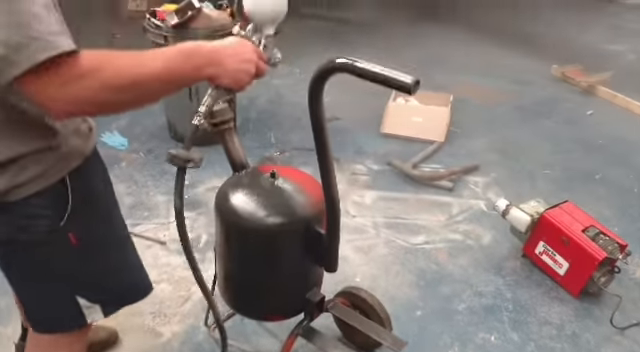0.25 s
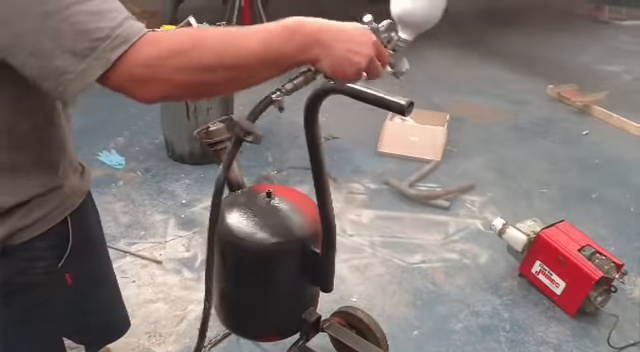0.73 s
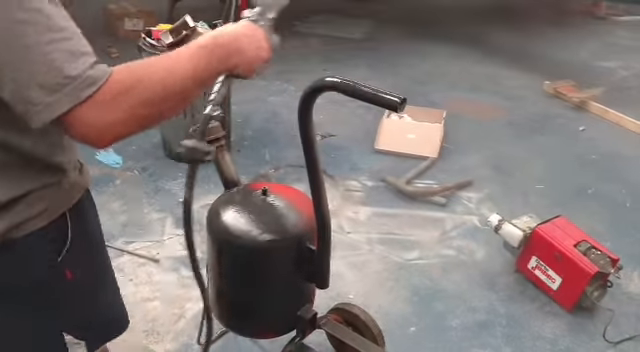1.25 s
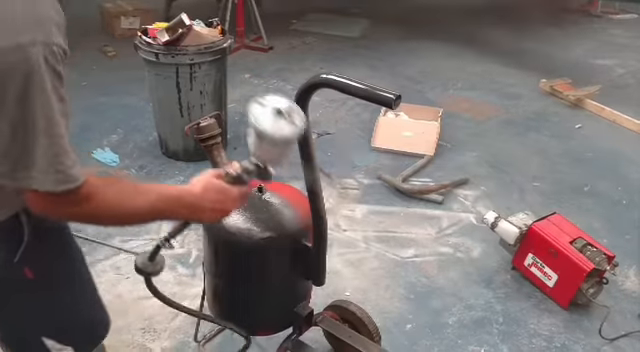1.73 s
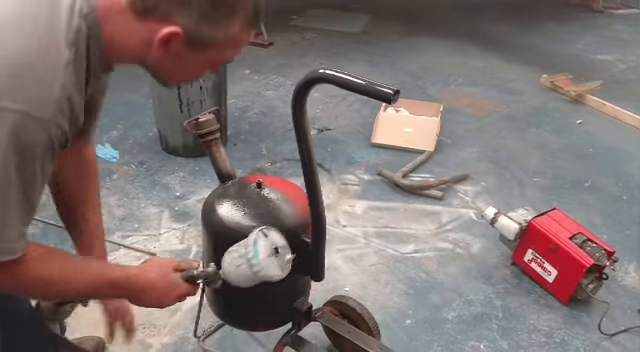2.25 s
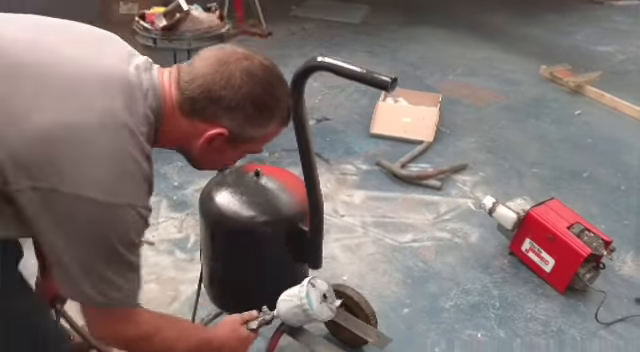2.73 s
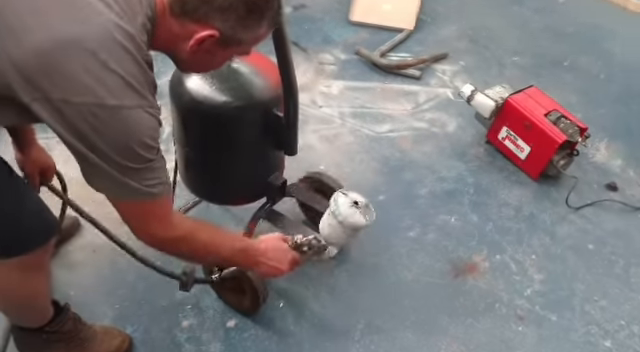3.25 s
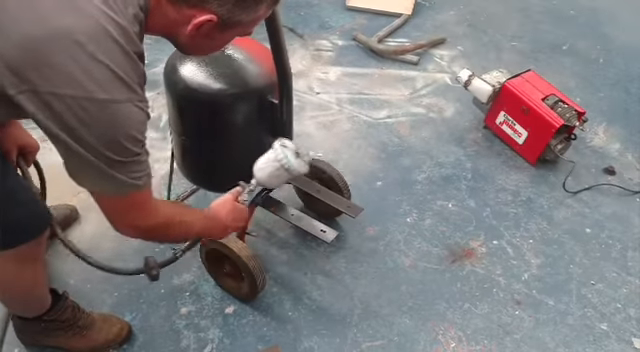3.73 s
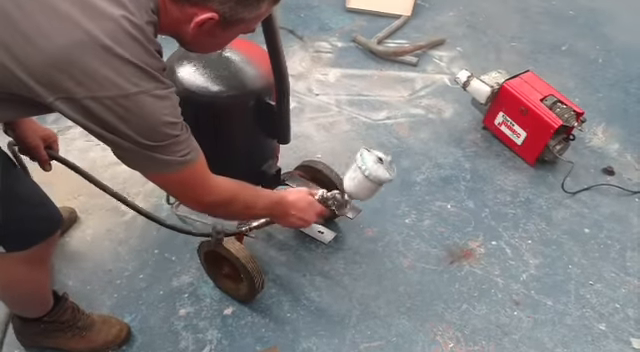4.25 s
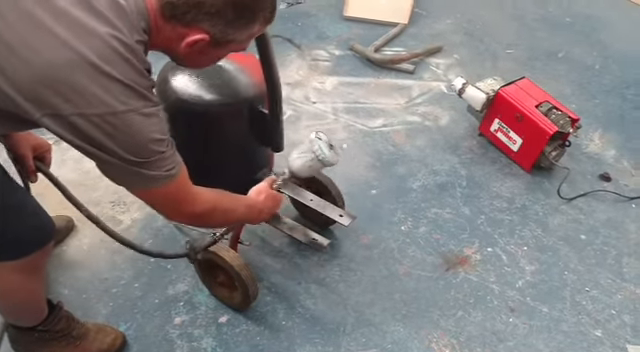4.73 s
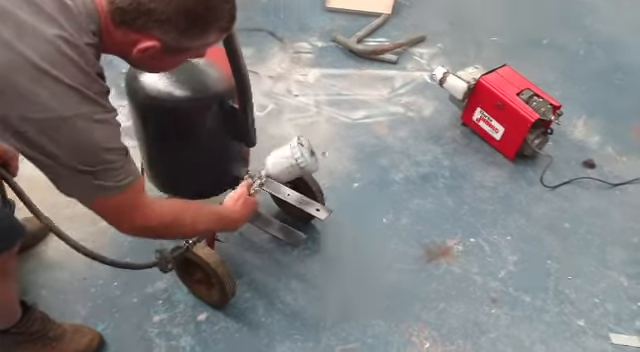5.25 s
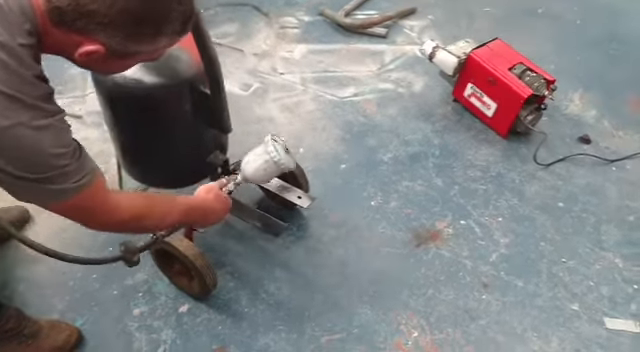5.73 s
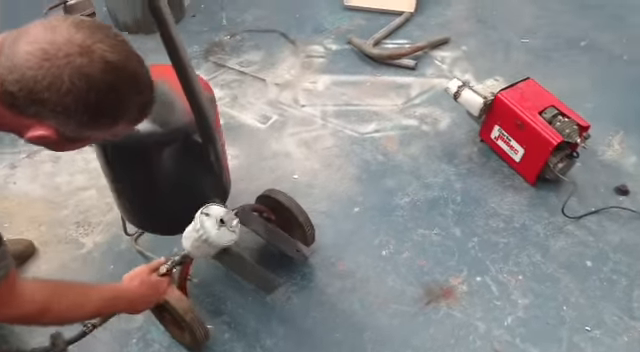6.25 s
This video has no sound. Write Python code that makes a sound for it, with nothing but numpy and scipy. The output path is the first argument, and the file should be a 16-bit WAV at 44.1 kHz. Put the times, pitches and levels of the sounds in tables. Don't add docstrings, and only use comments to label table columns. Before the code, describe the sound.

A compressed-air spray gun hisses in quick, uneven bursts in a large workshop while a motor hums and throbs faintly in the background.

```python
import sys
import numpy as np
from scipy import signal
from scipy.fft import rfft, irfft
from scipy.io import wavfile
from scipy.ndimage import uniform_filter1d

SR = 44100
rng = np.random.default_rng(int(sys.argv[2]) if len(sys.argv) > 2 else 0)


def magnitude_from_level(level_db):
    exponent = np.asarray(level_db, float) / 20
    return 10 ** exponent


def digitize_waveform(pressure):
    field = np.atleast_2d(pressure).T
    bounded = np.clip(field, -1, 1)
    quanta = np.round(bounded * 32767).astype(np.int16)
    wavfile.write(sys.argv[1], SR, quanta)


N = 286190

# valve opens [s], released [s], jet level [dB], opening puff [dB]
PULLS = [
    (-.05, 0.304, -29.5, 4),
    (0.413, 0.839, -31, -1.5),
    (0.963, 1.27, -32, -2),
    (1.762, 2.07, -31, -2),
    (2.908, 3.291, -29, 4),
    (3.412, 3.738, -32.5, 2),
    (3.869, 4.306, -31, -6),
    (4.413, 4.789, -30, -2.5),
    (4.981, 6.074, -32.5, 0),
    (6.308, 6.6, -33, 0),
]


def evened(x):
    return x / np.sqrt(np.mean(x ** 2) + 1e-20)


def read(points, hz):
    f, value = np.transpose(points)
    return np.interp(np.log(hz + 1), np.log(f + 1), value)


def hiss(shape_db, patchy_db, aimed=True):
    # frequency in Hz, likeness from -1 to 1
    alike = [(60, 0.28), (200, 1), (500, 0.99), (1200, 0.36), (2500, -0.036), (3700, 0.62), (5200, 0.16),
             (6500, -0.079), (9000, 0.15), (13000, -0.012), (15000, -0.15)]
    # frequency in Hz, phase in radians
    lead = [(100, 1), (350, 0.11), (800, 0.2), (1500, 0.016)]
    # time in seconds, added likeness
    facing = [(0, -.04), (1.3, -0.04), (3, 0.12), (4.9, 0), (5.15, -0.37), (5.45, -0.6), (5.55, -0.2),
              (5.8, -0.2), (5.9, -.6), (6.0, -0.6), (6.15, 0), (6.3, 0.1), (6.34, -0.7), (6.49, -0.4)]
    aim_hz, aim_width_hz = 5200, 1300
    wander = 0.18

    frames, hz = N // 128 + 5, np.fft.rfftfreq(512, 1 / SR)
    a, b, c, d, patches = rng.standard_normal((frames, 257, 5)).T
    patches = uniform_filter1d(patches, size=8, axis=0)
    patches = evened(uniform_filter1d(patches, size=24, axis=1))

    aim = aimed * np.interp(np.arange(frames) * 128 / SR, *np.transpose(facing))
    aim = aim * np.exp(-((hz[:, None] - aim_hz) / aim_width_hz) ** 2)
    drift = wander * np.roll(patches[::-1], 300, axis=1)
    same = np.clip(read(alike, hz)[:, None] + aim + drift, -0.98, 0.98)

    left = a + 1j * b
    shared = same * left * np.exp(1j * read(lead, hz))[:, None]
    right = shared + np.sqrt(1 - same ** 2) * (c + 1j * d)
    z = np.array([left, right]) * magnitude_from_level(shape_db(hz)[:, None] + patchy_db * patches)
    return evened(signal.istft(z, nperseg=512, noverlap=384)[1][:, :N])


def lift_db(t):
    lift_db_per_s, wait_s = 8, 0.033
    total = 0
    for (_, released, _, _), (next_start, _, _, _) in zip(PULLS, PULLS[1:]):
        total = total + lift_db_per_s * np.maximum(t - released - wait_s, 0) * (t < next_start)
    return total


def motor():
    # frequency in Hz, width in Hz, level in dB
    resonances = [(136, 16, 3), (439, 118, -1.5), (950, 410, -5.5), (1280, 130, -12), (1483, 343, 2),
                  (1994, 127, 1), (2580, 200, -3), (4020, 350, -14), (4920, 190, -14), (8100, 350, -12),
                  (12500, 400, -44)]
    # frequency in Hz, level in dB re motor
    whines = [(147, -13.5), (431, -12.5), (462, -21.5), (1413, -6), (1437, -20), (1480, -9), (1577, -11)]
    # frequency in Hz, level in dB
    fan = [(30, -40), (60, 6), (100, 26.5), (250, 16), (500, -9), (1500, 10), (3000, 14), (3600, -10),
           (8000, 6), (12500, -30), (16000, -36)]
    motor_db, fade_db_per_s = -47, -0.14
    fan_db, fan_patchy_db = -10.5, 2.2
    strokes_hz, throb = 70.4, 0.19

    t = np.arange(N) / SR
    hz = np.fft.rfftfreq(N, 1 / SR)
    z = rng.standard_normal((3, N))
    ports = z[:2] + 0.36 * z[2]
    power = sum(magnitude_from_level(2 * db) / (1 + (2 * (hz - f) / w) ** 4) for f, w, db in resonances)
    casing = evened(irfft(rfft(ports) * np.sqrt(power), N))

    drift = evened(uniform_filter1d(rng.standard_normal(N), size=3000))
    strokes = 1 + throb * np.cos(2 * np.pi * np.cumsum(strokes_hz * (1 + 0.039 * drift)) / SR)
    sound = casing * strokes
    sound = sound + magnitude_from_level(fan_db) * hiss(lambda hz: read(fan, hz), fan_patchy_db, aimed=False)

    for f, db in whines:
        waver = evened(uniform_filter1d(rng.standard_normal((N, 2)), size=4000, axis=0)).T
        phase = 2 * np.pi * np.cumsum(f + 2.93 * waver[1]) / SR
        sound = sound + magnitude_from_level(db - 2 + 0.87 * waver[0]) * np.sin(phase)
    return magnitude_from_level(motor_db + fade_db_per_s * (t - 3) + lift_db(t)) * sound


def room(x):
    t60_s, first_echo_s = 0.48, 0.006
    t = np.arange(SR // 2) / SR
    tail = rng.standard_normal((2, len(t))) * magnitude_from_level(-60 * t / t60_s) * (t > first_echo_s)
    return signal.fftconvolve(x, tail / np.linalg.norm(tail[0]), axes=1)[:, :N]


def trigger(t):
    leak_db = -54
    snap_db, valve_s, creep_db_per_s = -11, 0.007, -450
    puff_s = 0.0088
    shut_db, shut_s, drain_db_per_s = -2.5, 0.027, -140
    sweep_edge_s = 0.07

    power, off, dying = magnitude_from_level(2 * (leak_db + lift_db(t))), np.ones(N), np.zeros(N)
    for start, end, db, puff_db in PULLS:
        opening = snap_db * np.clip((start - t) / valve_s, 0, 1)
        opening = opening + creep_db_per_s * np.maximum(start - t, 0)
        surge = puff_db * np.exp(-abs(t - start) / puff_s)
        closing = shut_db * np.clip((t - end) / shut_s, 0, 1)
        closing = closing + drain_db_per_s * np.maximum(t - end, 0)
        power = power + magnitude_from_level(2 * (db + opening + surge + closing))
        off = off - np.clip(np.minimum(t - start, end - t) / sweep_edge_s, 0, 1)
        dying = dying + np.clip((t - end) / 0.045, 0, 1) * (t < end + 0.12)
    return 10 * np.log10(power), off, dying


def gun():
    # frequency in Hz, level in dB
    jet_shape = [(700, -17), (2000, -8), (4000, -4), (6000, -2), (9000, -1), (11500, -1.5), (13500, -4.5),
                 (15500, -9)]
    roar_shape = [(400, -35), (800, -6), (1500, -5), (2100, -7.5), (3200, -11.5)]
    flutter_shape = [(30, -45), (70, -17), (150, 0.5), (350, 8), (700, -1), (1200, -15)]
    # time in seconds, roar in dB
    strikes = [(0, -8.5), (1.2, -6.5), (1.9, -10.5), (3.1, -9.5), (3.6, -7.5), (4.2, -10), (4.72, -6.5),
               (4.805, 3.5), (4.84, -4.5), (5.07, -6), (5.19, 0.5), (5.42, -10.5), (5.55, -13.5),
               (5.67, -2.5), (5.82, -3), (5.97, -4), (6.08, -2), (6.49, -9.5)]
    # time in seconds, level in dB
    near = [(0, 1), (.2, 1), (.45, -1), (.6, 1), (1.2, 1.5), (2.05, 2), (2.97, -2), (3.27, 0), (3.46, 1),
            (3.6, 2.5), (4.03, -0.5), (4.17, 2.5), (4.5, 1), (4.65, -0.5), (5.25, 2.5), (5.45, 1),
            (6.05, 0.5), (6.49, 1.5)]
    buffet_db = [1, 0, 2.5, -7.5, 0, 2, 2.5, 0, 0, 5]
    sweep_ends_db = -4.5
    jet_share, flutter_share = 0.047, 0.9
    cavity_hz, cavity_width_hz = 1620, 380
    cavity_db, cavity_growth = -7, 2.6
    pan_db, tail_pan_db = 0.5, 0.5

    t = np.arange(N) / SR
    jet_db, off, dying = trigger(t)
    strike_db = np.interp(t, *np.transpose(strikes))
    roar_db = strike_db + sweep_ends_db * off
    flutter_db = -14 + flutter_share * strike_db + 0.7 * sweep_ends_db * off
    current_pull = np.searchsorted(np.transpose(PULLS)[0], t) - 1
    flutter_db = flutter_db + np.take(buffet_db, current_pull)

    def hollow_db(hz):
        return -10 * np.log10(1 + (2 * (hz - cavity_hz) / cavity_width_hz) ** 4)

    sound = magnitude_from_level(1.0 + jet_share * strike_db) * hiss(lambda hz: read(jet_shape, hz), 1.8)
    sound = sound + magnitude_from_level(roar_db + 1.6) * hiss(lambda hz: read(roar_shape, hz), 0.72)
    sound = sound + magnitude_from_level(flutter_db + 2.5) * hiss(lambda hz: read(flutter_shape, hz), 2.6)
    sound = sound + magnitude_from_level(cavity_db + cavity_growth * strike_db) * hiss(hollow_db, 1.4)

    gusts = evened(uniform_filter1d(rng.standard_normal(N), size=900))
    swing_db = np.interp(t, *np.transpose(near))
    balance_db = np.outer([0.7, -0.7], pan_db + tail_pan_db * dying)
    return magnitude_from_level(jet_db + swing_db + 0.76 * gusts + balance_db) * sound


def scene():
    spray = gun()
    return spray + magnitude_from_level(-9) * room(spray) + motor()


def widen(x):
    # frequency in Hz, share
    cross_feed = [(60, 0.31), (250, 0.39), (600, 0.36), (1300, 0.44), (2600, 0.62), (3900, 0.32),
                  (5200, 0.51), (9000, 0.49), (13000, 0.2), (15000, 0.43)]
    # frequency in Hz, level in dB
    port_tilt = [(60, 2), (150, -1.5), (1000, -1), (4000, 0), (8000, 1.7), (13000, 1.5)]
    delay_samples = 17
    lopsided = -0.12

    hz = np.fft.rfftfreq(N, 1 / SR)
    feed = np.clip(read(cross_feed, hz), 0, 0.98) * np.exp(-2j * np.pi * hz * delay_samples / SR)
    z = rfft(x)
    z = z - z[::-1] * feed * np.array([[1 + lopsided], [1 - lopsided]])
    return irfft(z * magnitude_from_level(np.outer([0.5, -0.5], read(port_tilt, hz))), N)


def dropouts(hz, t, quiet):
    # start in seconds, length in seconds, upper edge in Hz
    gaps = [
        (.37, .024, 900),
        (1.336, 0.088, 1150),
        (2.155, 0.12, 790),
        (3.811, 0.03, 700),
        (4.872, 0.05, 800),
        (6.131, 0.042, 520),
    ]
    # lower and upper edge in Hz, chance level over which it vanishes
    valleys = [(200, 350, .9), (540, 820, .9), (3450, 3750, .45), (4350, 4650, .6), (5050, 5450, 1.6)]
    linger_s, linger_edge_hz = 0.045, 12400
    quiet_edge_hz, edge_hz, ragged_hz = 13000, 15480, 130

    chance = rng.standard_normal((len(t), len(valleys) + 1))
    chance = uniform_filter1d(chance, size=6, axis=0).T * np.sqrt(6)
    lingering, lost = np.zeros(len(t), bool), np.zeros((len(hz), len(t)), bool)
    for s, length, high_hz in gaps:
        lost |= (hz < high_hz)[:, None] & (t >= s) & (t <= s + length)
        lingering |= (t > s + length / 2) & (t <= s + length + linger_s)
    for (low_hz, high_hz, odds), luck in zip(valleys, chance):
        in_valley = ((hz >= low_hz) & (hz < high_hz))[:, None]
        lost |= in_valley & quiet & (luck > odds - 1.5 * lingering)
    quiet_top_hz = np.where(lingering, linger_edge_hz, quiet_edge_hz) + ragged_hz * np.round(chance[-1])
    return ~lost & (hz[:, None] < np.where(quiet, quiet_top_hz, edge_hz))


def starve(x):
    # frequency in Hz, level in dB
    faint = [(150, -88), (300, -75), (700, -82.5), (950, -96), (3300, -92), (4000, -97), (5000, -84),
             (8000, -99)]
    # frequency in Hz, level in dB
    masked = [(1800, -30), (2300, -9), (4200, -9), (5400, -9.5), (6600, -10.5), (8000, -11), (13000, -11),
              (15000, -14)]
    quiet_db, spare_db = -40.5, 7
    rumble_cut_hz = 81

    def smooth_db(power, bins, frames):
        smooth = uniform_filter1d(uniform_filter1d(power, size=bins, axis=1), size=frames, axis=2)
        return 10 * np.log10(smooth + 1e-16)

    centre_difference = np.array([x[0] + x[1], x[0] - x[1]]) / 2
    hz, t, z = signal.stft(centre_difference, SR, nperseg=1024, noverlap=768)
    power = abs(z) ** 2
    treble_db = 10 * np.log10(4 / 3 * power[:, hz > 3000].sum((0, 1)) + 1e-12)
    quiet = treble_db < quiet_db

    keep = dropouts(hz, t, quiet)
    keep = keep * np.clip((smooth_db(power, 4, 4) - read(faint, hz)[:, None]) / 2, 0, 1)
    wide_db = smooth_db(power, 7, 5)
    keep = keep * (wide_db - wide_db[::-1] > read(masked, hz)[:, None] - spare_db * quiet)
    keep = keep / (1 + (rumble_cut_hz / (hz + 1)) ** 2)[:, None]
    mid, side = signal.istft(z * keep, SR, nperseg=1024, noverlap=768)[1][:, :N]
    return np.array([mid + side, mid - side])


def roll_off(x):
    return signal.sosfilt(signal.butter(12, 15950, fs=SR, output="sos"), x)


def record(dry):
    mix = starve(widen(dry))
    return roll_off(mix)


dry = scene()
out = record(dry)
digitize_waveform(out)
```